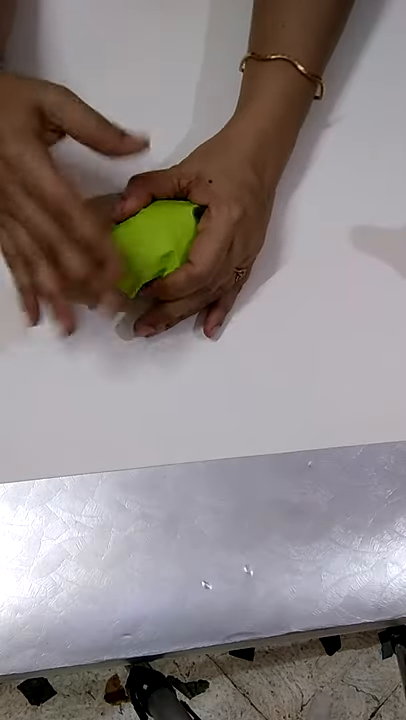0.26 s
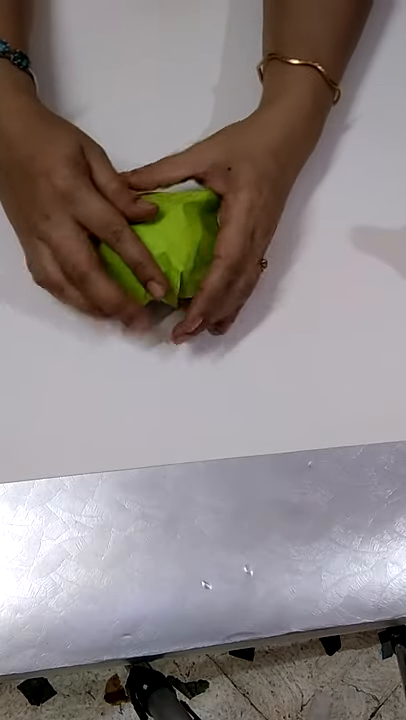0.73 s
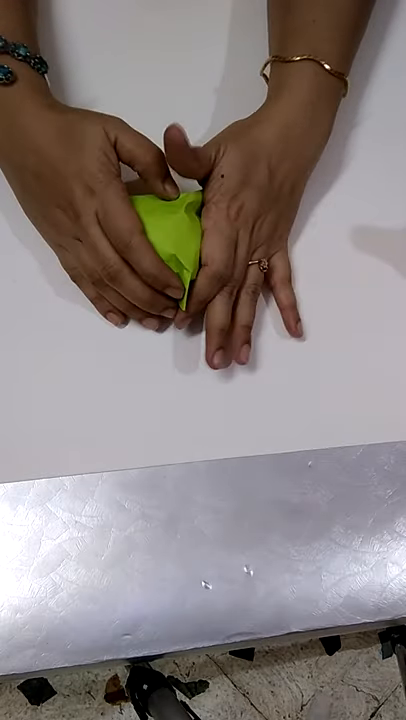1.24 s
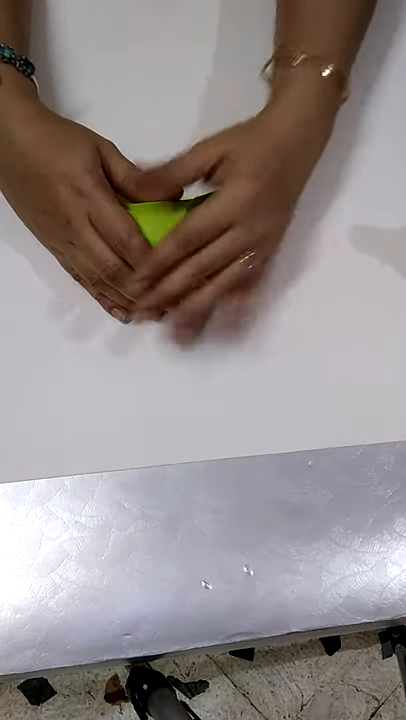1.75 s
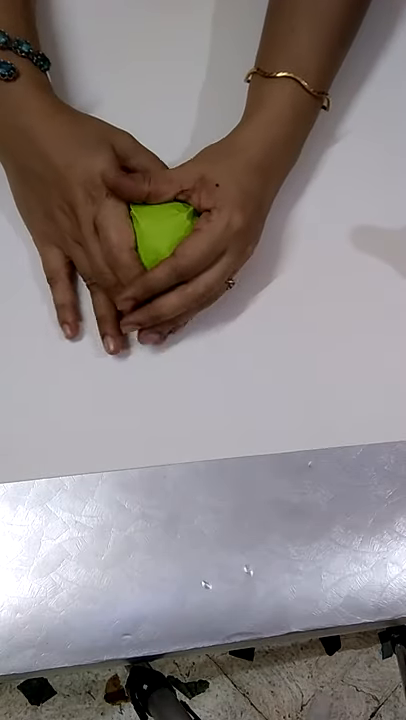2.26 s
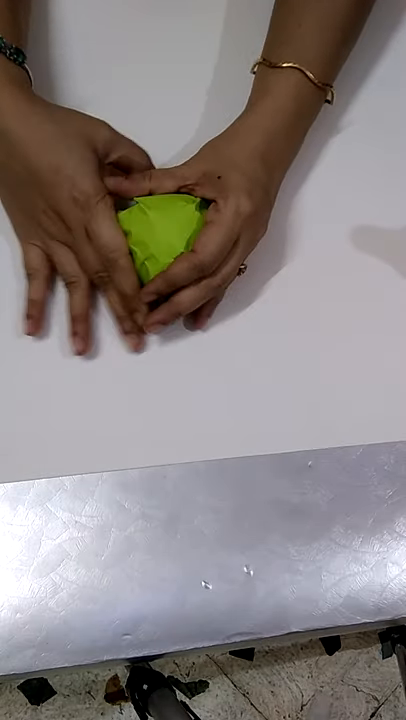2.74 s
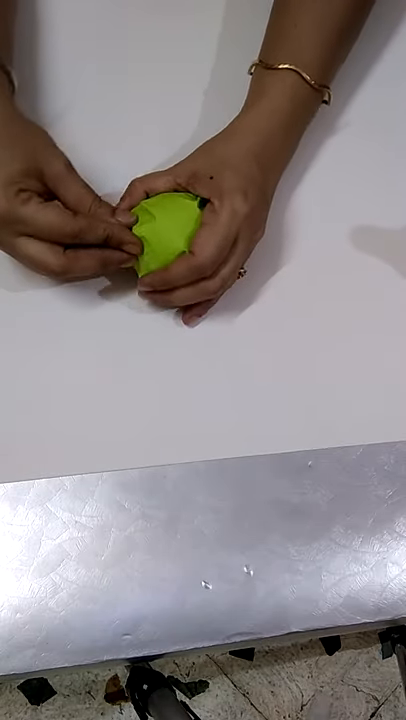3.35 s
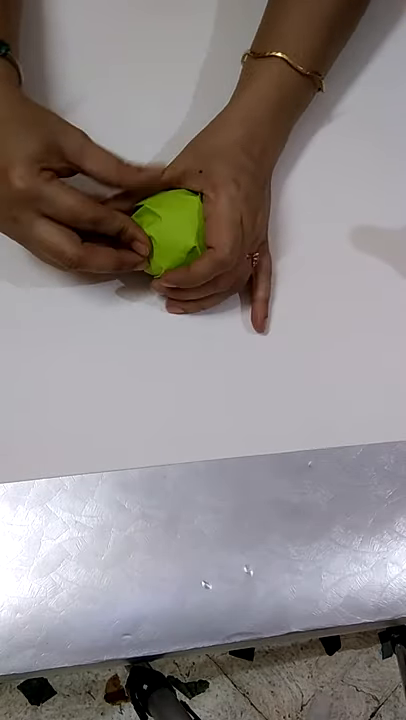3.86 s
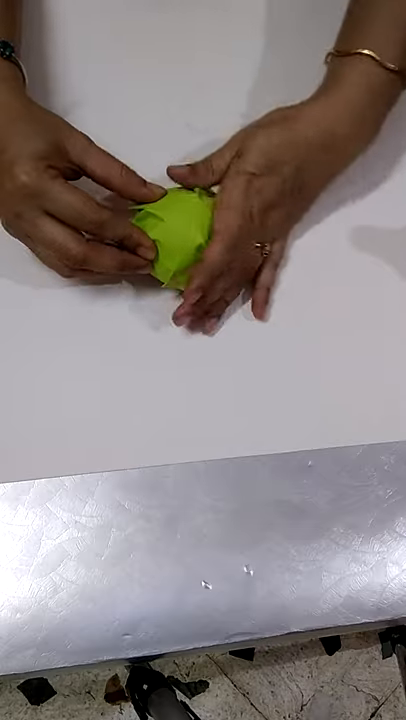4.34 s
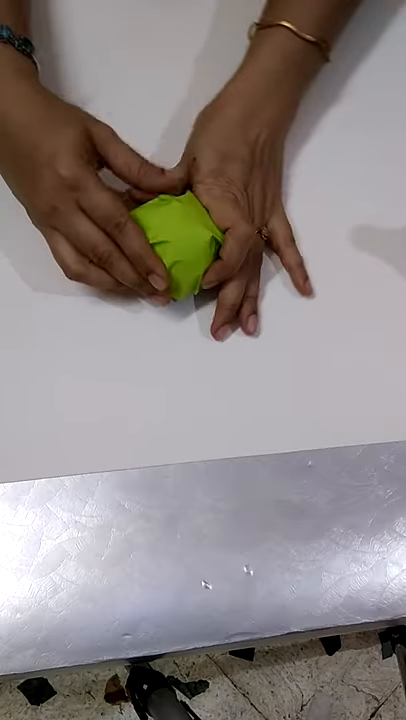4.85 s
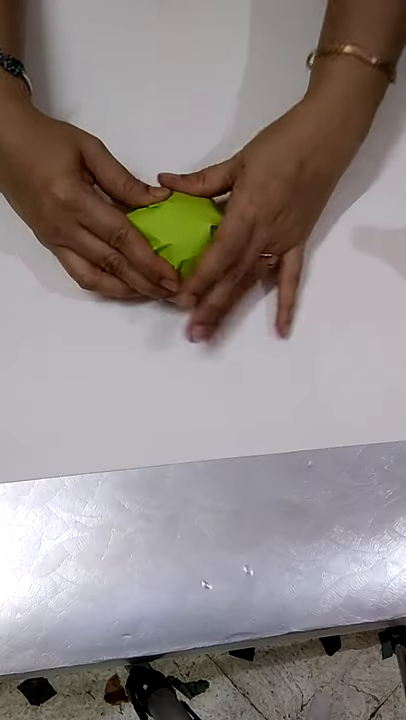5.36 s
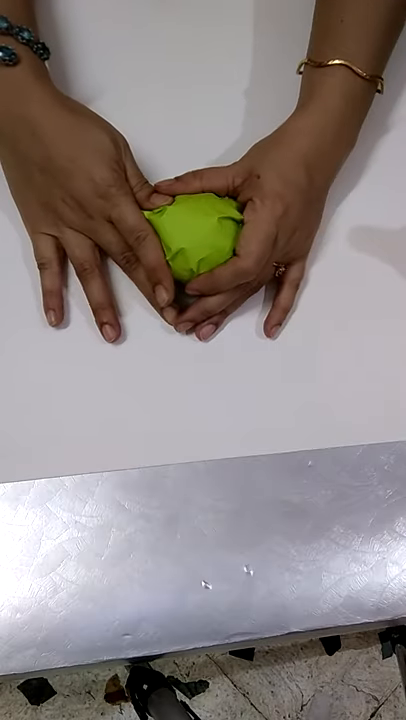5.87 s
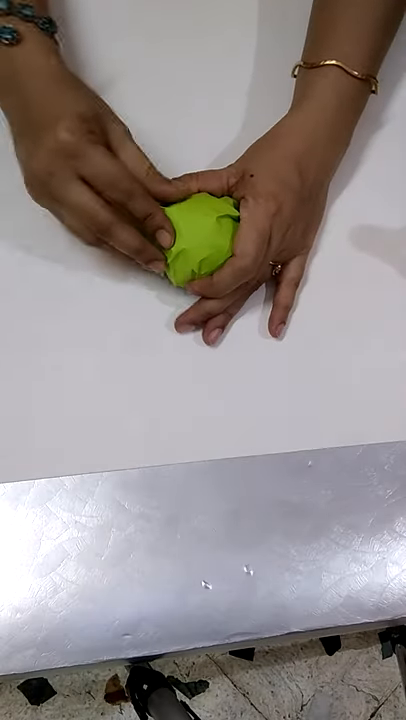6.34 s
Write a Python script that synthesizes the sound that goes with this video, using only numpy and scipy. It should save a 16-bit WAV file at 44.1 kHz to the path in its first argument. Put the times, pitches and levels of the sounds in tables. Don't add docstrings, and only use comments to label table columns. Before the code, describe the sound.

Two close microphones above a hollow table in a small bare room catch stiff paper being folded around a ball. From 0 to 0.5 seconds there are soft knocks, quick rustling swipes and a few dry ticks. After a sparse gap, creasing resumes near 0.9, with a strong hollow snap at 1.2 and dull hand thuds around 1.4. At about 2.1 the ball lands with the heaviest low thump and a bright brush of skin, followed by rolling bumps. Small airy pops gather from 2.5 to 3.1. Crisp crackles cluster from 3.2 to 3.9, then lighter rustle and cracks lead to a loud crack and hollow pop at 4.96. Knocks and crinkles continue densely from 5.2 to 6.2; a very sharp snap at 6.43 and smaller cracks end it. Short room echoes, faint hiss and a distant wavering hum lie beneath.

```python
import sys
import numpy as np
from scipy import signal
from scipy.fft import rfft, irfft
from scipy.io import wavfile
from scipy.ndimage import uniform_filter1d

SR = 44100
rng = np.random.default_rng(int(sys.argv[2]) if len(sys.argv) > 2 else 0)


def voltage_ratio(level):
    return 10 ** (np.asarray(level, float) / 20)


def dump(signal):
    limited = np.clip(np.atleast_2d(signal).T, -1, 1)
    pcm = np.round(limited * 32767).astype(np.int16)
    wavfile.write(sys.argv[1], SR, pcm)


N = 291060
HZ = np.maximum(np.arange(N // 2 + 1) * SR / N, 1)


def rms_one(x):
    return x / np.sqrt(np.mean(x ** 2) + 1e-20)


def in_time(rows):
    s, *columns = np.transpose(rows)
    return [np.interp(np.arange(N) / SR, s, c) for c in columns]


def colour(x, points):
    hz, db = np.transpose(points)
    gain = voltage_ratio(np.interp(np.log(HZ), np.log(hz), db))
    return irfft(rfft(x, N) * gain, N)


def resonate(x, hz, width_hz):
    r = np.exp(-np.pi * width_hz / SR)
    poles = [1, -2 * r * np.cos(2 * np.pi * hz / SR), r * r]
    return signal.lfilter((1 - r * r) / 2 * np.array([1, 0, -1]), poles, x)


def ring(x, hz, t60):
    r = voltage_ratio(-60 / (t60 * SR))
    w = 2 * np.pi * hz / SR
    return signal.lfilter([0, np.sin(w)], [1, -2 * r * np.cos(w), r * r], x + 1e-18)


def butter(x, order, hz, kind="low"):
    return signal.lfilter(*signal.butter(order, hz, kind, fs=SR), x)


def grains(per_s, spread_db):
    draw = rng.random(N)
    sizes = np.minimum(rng.exponential(1, N), 5)
    return rms_one((draw < per_s / SR) * voltage_ratio(spread_db * sizes) * rng.choice([-1, 1], N))


def flutter():
    size = round(22 * SR / 1000)
    jerks = rms_one(uniform_filter1d(rng.standard_normal(N), size=size, mode="wrap"))
    return voltage_ratio(6.5 * np.clip(jerks, -2, 2))


# (pitch [re pocket], width [re pocket], level [dB])
AIR_MODES = [(.8, 0.73, -17.5), (1.0, 0.27, 12), (1.35, 0.32, 12), (1.5, 0.5, 8.5)]


def pocket(x, hz):
    air = 0
    for k, (ratio, width, db) in enumerate(AIR_MODES):
        air = air + (-1) ** k * voltage_ratio(db) * resonate(x, ratio * hz, width * hz)
    air = butter(air, 3, 2.0 * hz)
    return butter(air, 2, .5 * hz, "high")


# (frequency [Hz], level [dB per Hz])
HISS_COLOUR = [(18, -11), (60, -12.5), (110, -21.5), (300, -21), (600, -8), (1600, -17.5), (4000, -16),
               (16500, -18)]
# (frequency [Hz], level [dB rms])
HUM_TONES = [(455, -76), (697, -99), (2130, -91)]
# (time [s], hum level [dB])
MACHINE_LOAD = [(0.0, -1), (0.9, 0), (1.7, 2), (2.6, -3), (3.6, -5), (4.1, -1), (4.5, -6), (5.5, -4),
                (6.15, 3), (6.6, 1)]


def background():
    hiss = voltage_ratio(-69) * rms_one(colour(rng.standard_normal((2, N)), HISS_COLOUR))
    wobble = uniform_filter1d(rng.standard_normal(N), size=6000)
    load_db = in_time(MACHINE_LOAD)[0] + 2 * rms_one(wobble)
    t = np.arange(N) / SR
    hum = sum(voltage_ratio(db + 5 + load_db) * np.sin(2 * np.pi * hz * t) for hz, db in HUM_TONES)
    return hiss + hum


# (frequency [Hz], level [dB per Hz])
SHEET_COLOUR = [(500, -32), (1500, -3), (2800, -5), (4500, -6), (6000, -2.5), (11000, 8), (15500, -5),
                (16800, -39)]
# (time [s], level [dB], swell [ms], fade [ms])
SKIN_SLIDES = [(0.0, -52, 21, 21), (0.1, -59, 18, 18), (0.178, -46, 11, 22), (0.44, -59, 28, 18),
               (0.527, -47, 18, 28), (0.84, -64, 18, 14), (0.95, -56, 28, 18), (1.033, -44, 18, 18),
               (1.12, -55, 28, 18), (1.24, -46, 18, 35), (1.49, -59, 25, 18), (1.65, -59, 18, 22),
               (1.96, -49, 45, 35), (2.124, -35, 7, 11), (2.32, -57, 18, 18), (2.4, -56, 14, 18),
               (2.47, -56, 14, 14), (2.56, -57, 11, 14), (2.66, -66, 14, 14), (2.812, -48, 11, 28),
               (2.93, -55, 28, 28), (3.07, -54, 28, 28), (3.27, -55, 14, 14), (3.56, -59, 18, 16),
               (3.87, -52, 27, 18), (4.17, -68, 5, 8), (4.26, -59, 24, 18), (4.36, -66, 14, 14),
               (4.47, -48, 14, 22), (4.72, -49, 28, 28), (4.79, -47, 14, 11), (5.04, -51, 28, 28),
               (5.25, -59, 18, 18), (5.34, -49, 28, 28), (5.65, -58, 28, 35), (5.75, -59, 18, 18),
               (5.87, -54, 28, 25), (5.95, -49, 14, 22), (6.06, -54, 28, 25), (6.13, -53, 25, 28),
               (6.38, -57, 14, 14), (6.53, -54, 28, 60)]
# (time [s], level [dB], rise [ms], fall [ms])
SHEET_SWIPES = [
    (0.158, -47, 3.1, 5.5),
    (0.492, -63.5, 2.2, 17),
    (0.795, -66, 6, 18),
    (1.44, -51, 7.4, 9.4),
    (1.615, -55.5, 1.4, 8.5),
    (1.863, -56, 2.2, 7.5),
    (2.783, -52.5, 5.6, 10.5),
    (3.227, -54, 3.1, 15),
    (4.39, -53, 1.4, 45),
    (5.59, -66, 6, 16),
]


def rustle(rub_db):
    ms, gain = np.arange(N) / SR * 1000, voltage_ratio(-137)
    for s, db, swell_ms, fade_ms in SKIN_SLIDES:
        away = np.maximum((1000 * s - ms) / swell_ms, (ms - 1000 * s) / fade_ms)
        gain = gain + voltage_ratio(db) * np.exp(-.5 * away ** 2)
    for s, db, rise_ms, fall_ms in SHEET_SWIPES:
        since = np.maximum(ms - 1000 * s, 0)
        gain = gain + 2 * voltage_ratio(db) * (1 - np.exp(-since / rise_ms)) * np.exp(-since / fall_ms)
    fine = rms_one(colour(grains(12000, spread_db=3.0), SHEET_COLOUR))
    large_folds = pocket(grains(900, spread_db=5.0), 1300)
    small_folds = pocket(grains(600, spread_db=5.0), 1800)
    coarse = rms_one(large_folds + small_folds)
    return gain * fine * flutter() ** 0.5 + voltage_ratio(rub_db - 3.0) * coarse * flutter() ** 0.5


# (time [s], lowest mode [dB], second mode [dB re lowest])
HAND_DROPS = [(0.001, -26, -3), (0.138, -24, -2), (0.492, -21, -1), (1.278, -28.5, 3), (1.418, -13, -6),
              (1.464, -22, -6), (1.545, -27, -18), (1.56, -21, -5), (1.954, -27, -6), (1.967, -19.5, -7.5),
              (2.194, -13.5, -8), (2.229, -17, 0.5), (2.252, -11.5, -10.5), (2.424, -37, 8.5),
              (2.464, -26.5, 2), (2.622, -22, -6.5), (2.646, -23, -1), (3.808, -28, -2), (4.215, -28, -18),
              (4.259, -18.5, -4.5), (4.387, -29.5, -7), (4.593, -26, 1), (4.634, -22, -7.5),
              (4.951, -33, 7.5), (5.011, -20, -3), (5.637, -31.5, -2), (5.863, -21, -0.5),
              (5.882, -14, -6.5)]


def hand_edges():
    return [(s, db, second_db, -6.5) for s, db, second_db in HAND_DROPS]


# (time [s], lowest mode [dB], upper modes [dB re lowest])
BALL_LANDINGS = [(0.045, -25.5, -42), (0.153, -30, -18), (1.17, -28, -46), (1.214, -16.5, -3.5),
                 (1.322, -18, -12.5), (1.87, -30.5, -1.5), (1.987, -15, -32), (2.111, -7.5, -11),
                 (2.557, -17.5, -6), (2.81, -19.5, -4), (3.116, -37.5, 4), (3.233, -14, -12.5),
                 (4.026, -31, -14), (4.91, -20, -6.5), (5.045, -14, -5), (5.281, -28, 1.5),
                 (5.578, -30.5, -20), (5.714, -44, 7), (6.008, -24.5, -13), (6.096, -31, -1),
                 (6.363, -39, 2.5), (6.42, -34.5, -2), (6.577, -39, -10)]


def ball():
    return [(s, db, -9.5, upper_db) for s, db, upper_db in BALL_LANDINGS]


# (time [s], lowest mode [dB], second mode [dB re lowest])
FINGER_TAPS = [(0.25, -30, 4), (0.386, -35, -23), (0.425, -47, -7), (0.458, -48, 5), (0.076, -40, -12),
               (0.291, -44, -3), (0.594, -60.5, 15), (2.839, -39.5, 4), (2.88, -42, -6), (3.931, -53, -9),
               (4.66, -37, 9), (4.701, -45.5, 3), (4.874, -44, 1), (5.599, -43.5, 13), (5.68, -57, -7),
               (5.743, -65, -11), (5.774, -48, -14), (5.986, -37, -11), (2.394, -36.5, 9),
               (2.973, -35.5, -8), (2.989, -28.5, 1.5), (3.026, -33.5, -17), (3.061, -26, -11),
               (3.725, -30.5, -34), (3.741, -29.5, -1.5), (5.227, -31.5, -33), (5.332, -26, 5.5),
               (5.509, -35.5, -25), (5.538, -37.5, -20), (5.826, -34.5, -24), (5.928, -27, 3),
               (6.513, -39.5, -19), (6.554, -37.5, -22)]


def fingertips():
    return [(s, db, second_db, 4.5) for s, db, second_db in FINGER_TAPS]


# (frequency [Hz], level [dB], t60 [s])
TOP_MODES = [(179.3, -2.5, 0.2), (227.3, 6.5, 0.1), (289.6, 5.5, 0.044), (356, 0.5, 0.066),
             (396.5, -9.5, 0.19), (462.5, -12, 0.1), (561.3, -1, 0.043), (691, -7, 0.074)]
# (frequency [Hz], level [dB], t60 [s])
LEG_MODES = [(62.5, -13.5, 0.15), (77.7, -20.5, 0.37)]
# (time [s], extra drive of the highest modes [dB])
TOUCH_HARDNESS = [(0.0, -9), (0.7, -11), (1.3, -8), (2.05, -7), (2.2, 6), (2.45, 5), (2.75, -10), (3.05, 2),
                  (3.4, -2), (4.3, 3), (4.7, 1), (5.2, 5), (5.6, -3), (5.9, 1), (6.6, -2)]
# (time re contact [ms], drive of upper modes [dB])
HAND_SETTLING = [(-4.0, -10), (0.0, -1.5), (5.5, -4.5), (12.0, -7)]
# (time [s], level [dB])
LEG_NUDGES = [
    (6.49, -44),
    (6.53, -39),
    (6.565, -48),
    (0.95, -48),
    (6.2, -46),
    (3.3, -56),
    (1.8, -48),
]


def table(rumble_db):
    s, peak_db, second_db, upper_db = np.transpose(ball() + hand_edges() + fingertips())
    at, top, legs = np.round(s * SR).astype(int), 0, 0
    rolling = voltage_ratio(rumble_db - 36) * grains(per_s=1200, spread_db=3.5) * flutter()
    chance = rng.standard_normal((len(at), 9))
    hard_db = in_time(TOUCH_HARDNESS)[0]
    load = np.digitize(chance[:, 8], [-.45, .45]) - 1
    for k, (hz, db, t60) in enumerate(TOP_MODES):
        share_db = [0, second_db, upper_db + 1.6 * chance[:, k]][min(k, 2)]
        steps = HAND_SETTLING if k > 1 else [(0, 0.0041)]
        for bend in (-1, 0, 1):
            push = rolling * (bend == (k % 3) - 1)
            for step, (ms, step_db) in enumerate(steps):
                uneven = 1 + .3 * np.tanh(chance[:, step + 1])
                late = np.maximum(at + np.round(ms * SR / 1000 * uneven).astype(int), 0)
                drive = voltage_ratio(peak_db - 12.0 + share_db + step_db) * np.sign(chance[:, step])
                push[late] += (load == bend) * drive
            push = push * voltage_ratio(hard_db * (k > 4))
            bent_hz = hz * (1 + 0.05 * bend * min(k + 1, 3) / 3)
            top = top + voltage_ratio(db) * ring(push, bent_hz, t60)
    push = rolling + voltage_ratio(-86) * rng.standard_normal(N)
    push[at] += voltage_ratio(peak_db - 21.5)
    for s, db in LEG_NUDGES:
        push[round(s * SR)] += voltage_ratio(db)
    push = push + voltage_ratio(-85.0) * rng.standard_normal((2, N))
    for hz, db, t60 in LEG_MODES:
        legs = legs + voltage_ratio(db) * resonate(ring(push, hz, t60), hz, 42)
    flesh = np.hanning(round(1.86 * SR / 1000))
    soft = signal.butter(4, 820, fs=SR, output="sos")
    thin = signal.butter(8, 150, "high", fs=SR, output="sos")
    pushed = np.convolve(top, flesh / flesh.sum(), "same")
    return signal.sosfilt(np.vstack([soft, thin]), pushed) + legs


# (start [s], level [dB], pocket [Hz], length [ms])
THUMB_DRAGS = [(0.803, -70, 1050, 55), (0.46, -61.5, 1400, 110), (0.97, -55, 2500, 33),
               (2.631, -68, 2140, 55), (4.714, -52, 2700, 25), (5.545, -68, 1280, 70),
               (1.19, -48, 1300, 86), (1.6, -50, 2900, 30), (1.7, -72, 3400, 43), (4.39, -68, 700, 81),
               (5.2, -63.5, 654, 190), (3.5, -69, 750, 33), (0.012, -66, 2460, 48), (2, -63, 690, 254),
               (0.71, -72, 2800, 370), (3.2, -69.5, 3200, 89), (6.09, -63, 1350, 36)]


def drags():
    out = np.zeros(N)
    for s, db, hz, length_ms in THUMB_DRAGS:
        at, count = round(s * SR), round(length_ms * SR / 1000)
        swell = np.sin(np.pi * np.arange(count) / count) ** .5
        rub = rng.standard_normal(20000)[:count] * swell
        out[at:at + count] += voltage_ratio(db) * rms_one(pocket(rub, hz))
    return out * flutter() ** .3


def snaps(rows, ping=False):
    out, ms = np.zeros((2, N + 800)), np.arange(800) / SR * 1000 - 3
    noises = rng.standard_normal((len(rows), 800))
    for (s, peak_db, pop_db, pop_hz, length_ms, sharp_db), noise in zip(rows, noises):
        after = np.maximum(ms, 0)
        creak = 0.44 * np.exp(np.minimum(ms, 0) / 0.099)
        swell = creak + 1 - np.exp(-after / 0.7)
        burst = noise * swell * np.exp(-after / max(0.27 * length_ms, .08))
        click = (np.arange(800) == 140) * np.sqrt(np.sum(burst ** 2))
        both = np.array([burst, click])
        hz = 9000 * 1.25 ** np.clip(noise[0], -2, 2)
        bright = both + resonate(both, hz, .6 * hz)
        bright = resonate(resonate(bright, 5200, 26000), 7600, 30000)
        dull = butter(bright, 2, 3370)
        top_hz = min(15730 * 2 ** (min(sharp_db, 0) / 29), .45 * SR)
        bright = butter(dull + voltage_ratio(sharp_db) * (bright - dull), 2, top_hz)
        pop = pocket(np.array([click + 0.94 * burst, click]), pop_hz)
        if ping:
            pop = resonate(pop, pop_hz, 0.33 * pop_hz)
        snap = bright / abs(bright[0]).max() + voltage_ratio(pop_db + 8.5) * pop / abs(pop[0]).max()
        at = round((s - .003) * SR)
        out[:, at:at + 800] += voltage_ratio(peak_db + 4.0) * snap
    return out[:, :N]


# (time [s], peak [dB], length [ms], sharpness [dB])
CREASE_CRACKS = [(0.0689, -32, 2.1, -16), (0.138, -37.5, 1.5, 23), (0.2278, -25.5, 0.52, 4),
                 (0.2513, -32.5, 3.8, -7.5), (0.9112, -33, 1.2, -12.5), (1.8649, -32, 0.18, -13),
                 (1.935, -32.5, 0.5, -13.5), (1.955, -37, 5.7, -8), (3.1663, -49, 1.1, 0.5),
                 (3.2962, -30.5, 2.2, -7), (2.374, -38.5, 0.99, -18.5), (1.992, -36, 0.99, 6),
                 (4.168, -50, 1.3, -13), (3.238, -41, 2.4, 3), (3.469, -41, 1.3, 7), (3.521, -62, 1.9, -12),
                 (3.43, -38.5, 1.4, -1.5), (3.5042, -28, 1.6, 4), (3.748, -27, 1.5, -6),
                 (3.789, -26, 1.8, -10), (3.8097, -22.5, 0.63, -12), (3.9128, -22.5, 2.5, 4.5),
                 (4.1939, -40.5, 1.1, 18), (4.444, -24.5, 3.9, -8), (4.6868, -22, 0.42, -16),
                 (4.9616, -14.5, 0.79, -4.5), (1.4758, -34.5, 2.8, -23), (2.151, -61, 3.5, -10),
                 (1.511, -66, 3, -18), (5.202, -38.5, 1.2, 18), (5.9296, -34.5, 2.2, -11),
                 (6.0653, -34, 0.57, 20), (6.3448, -33, 1.4, -10.5), (6.365, -28.5, 3.3, -10),
                 (6.516, -21, 0.74, 10), (6.536, -27, 1.5, -2), (6.557, -45.5, 2.2, -21)]


def cracks():
    return snaps([(s, db, -36, 1240, ms, sharp_db) for s, db, ms, sharp_db in CREASE_CRACKS])


# (time [s], pop [dB], pocket [Hz], crack [dB re pop])
BULGE_POPS = [(0.872, -53, 1510, 6), (1.0066, -43, 1255, 19.5), (1.418, -40, 1760, -0.5),
              (1.476, -37.5, 1443, -16), (1.5449, -41.5, 1260, -32), (2.3373, -46.5, 1240, -4),
              (2.5496, -42.5, 1370, 4.5), (2.622, -46, 1380, -17), (2.637, -43, 1980, -34),
              (2.6897, -42, 2080, -22), (2.7982, -46, 1540, -10), (2.809, -42, 1395, 9),
              (2.974, -41.5, 1470, 9.5), (2.9882, -42.5, 1390, 7), (3.0008, -40, 1650, -15),
              (3.029, -33, 1680, 7), (3.0625, -32, 1680, 1), (3.6886, -50.5, 1360, -14),
              (3.674, -54, 1426, -10), (4.236, -57.5, 1380, -3), (0.251, -56, 1330, -13),
              (3.71, -42.5, 1230, 12.5), (4.017, -57, 1490, 4), (4.7618, -46.5, 1400, -3),
              (4.909, -48.5, 1550, -2), (4.9553, -35, 1320, 7), (4.9597, -20.5, 1316, 6.5),
              (5.594, -61, 1465, 20.5), (5.8619, -39, 1034, 9)]


def bulges():
    return snaps([(s, db + crack_db, -crack_db, hz, 0.7, -15.5) for s, db, hz, crack_db in BULGE_POPS])


# (time [s], peak [dB], hollow pop [dB re peak], sharpness [dB])
FOLD_SNAPS = [(0.3871, -36.5, -18.5, 27), (0.8899, -39, -32, -8), (1.185, -13.5, -12.5, -13),
              (1.64, -44, -6, -14.5), (2.112, -28, -16.5, -11), (2.9322, -42.5, -13, 9),
              (3.2328, -28.5, -14.5, -13.5), (3.3057, -23, -19.5, -7), (3.482, -35.5, -16, 14),
              (3.7275, -24, -20.5, -15), (3.7616, -34.5, -14.5, -10), (4.251, -48, -17, 11),
              (4.3875, -34, -7, -14), (4.649, -27, -26, -17.5), (4.656, -34, -13.5, -15.5),
              (5.226, -34.5, -14, 7), (5.283, -31.5, -12.5, -2), (5.3316, -28, -13.5, -14),
              (5.6508, -43.5, -28, -20), (5.681, -32.5, -17, -12), (5.732, -39.5, -28, -24),
              (5.778, -38.5, -11, -10), (5.8021, -35, -20, -11.5), (5.8282, -28.5, -9.5, -12.5),
              (5.883, -28.5, -12, -14.5), (5.909, -31, -10, 9), (6.01, -29.5, -15.5, -13),
              (6.104, -36.5, -37, -18.5), (6.152, -40.5, -13, 13.5), (6.425, -8.5, -18, 8)]


def folds():
    return snaps([(s, db, pop_db, 1550, 2.39, sharp_db) for s, db, pop_db, sharp_db in FOLD_SNAPS])


# (time [s], pop [dB], pocket [Hz], crack [dB re pop])
SMALL_CRINKLES = [(1.008, -39, 2300, 3.5), (0.79, -55, 1600, -10.5), (4.3, -62, 1500, -18),
                  (3.8, -53, 2200, -18), (6.5, -51.5, 1360, -18), (5.583, -48.5, 1360, -5),
                  (5, -56, 1400, -12), (5.714, -54, 1500, -12), (5.736, -65, 1420, -12),
                  (5.927, -51, 820, 11), (6.028, -50.5, 1450, -12), (6.11, -54, 1290, -20),
                  (6.134, -51.5, 1310, -22), (4.5, -65, 800, -18), (4.268, -65, 1500, -16),
                  (5.8, -56, 1400, -26), (2.4, -60.5, 1300, -22.5), (1.197, -42, 1000, -15),
                  (1.285, -45.5, 1350, -12), (5.052, -40.5, 1350, -15), (5.068, -41, 1600, -18),
                  (3.922, -56, 1500, -10), (5.652, -52, 1530, -10), (5.1, -48, 1480, -6),
                  (5.779, -47, 1450, -7)]


def crinkles():
    rows = [(s, db + crack_db, -crack_db, hz, 3, -7) for s, db, hz, crack_db in SMALL_CRINKLES]
    return snaps(rows, ping=True)


# (delay [ms], level [dB])
EARLY_BOUNCES = [(2.2, -13), (3.6, -9), (5.0, -18)]


def near_echoes(x):
    out = np.array([x, x])
    for ms, db in EARLY_BOUNCES:
        for side, extra_ms in enumerate((.25, 0)):
            lag = round((ms + extra_ms) * SR / 1000)
            out[side, lag:] += voltage_ratio(db) * x[:-lag]
    return out


# (frequency [Hz], t60 [s])
ROOM_DECAY = [(200, 0.24), (1000, 0.44), (4000, 0.42), (8000, 0.42), (15000, 0.3)]


def room_tail():
    t, tail = np.arange(int(.7 * SR)) / SR, 0
    edges = 100 * 2 ** np.arange(0, 7.5, .75)
    noise = rng.standard_normal((2, 2, len(t)))
    hz, t60 = np.transpose(ROOM_DECAY)
    for k, (low, high) in enumerate(zip(edges, np.append(edges[1:], 19000))):
        band_pass = signal.butter(2, [low, high], "band", fs=SR, output="sos")
        band = signal.sosfilt(band_pass, noise[k % 2])
        band_t60 = np.interp(np.log(low * high) / 2, np.log(hz), t60)
        tail = tail + band * voltage_ratio(-60 * (t / band_t60) ** 0.58)
    tail = tail * voltage_ratio(np.interp(t, [.001, .002, .012, .014], [-60, -13, -13, 0]))
    walls = rms_one(uniform_filter1d(rng.standard_normal(len(t)), size=90))
    tail = tail * voltage_ratio(2.2 * walls)
    return voltage_ratio(-4.5) * tail / np.sqrt(np.sum(tail[0] ** 2))


# (time [s], squeeze of the folds [dB], weight rolling on the table [dB])
HAND_WORK = [(0.0, -66, -46), (0.5, -80, -69), (0.93, -90, -64), (1.3, -55, -60), (1.43, -80, -42.5),
             (1.75, -80, -60), (2.2, -66, -41), (2.48, -58.5, -44), (2.79, -58, -60.5), (3.12, -63, -54),
             (3.46, -71, -62.5), (4.49, -74, -65), (5.16, -54, -50), (5.35, -87, -76.5), (5.59, -62, -48.5),
             (5.96, -57, -46), (6.2, -75, -68), (6.6, -70, -50)]


def scene():
    rub_db, rumble_db = in_time(HAND_WORK)
    creases = cracks() + folds() + bulges()
    sheet = creases + rustle(rub_db) + drags()
    knocks = table(rumble_db)
    tail, floor = room_tail(), background()
    near, all_round = sheet + crinkles()
    paper = near_echoes(near)
    left = np.roll(paper[0] + knocks[0], 6)
    direct = np.array([left, paper[1] + knocks[1]])
    to_room = all_round + voltage_ratio(-8) * knocks[1]
    return direct + signal.fftconvolve(to_room[None], tail, axes=1)[:, :N] + floor


def hush(pair):
    high_pass = signal.butter(2, 1920, "high", fs=SR, output="sos")
    treble = signal.sosfiltfilt(high_pass, pair)
    level_db = 10 * np.log10(uniform_filter1d(np.mean(treble ** 2, axis=0), size=900) + 1e-14)
    cut_db = np.clip(-56 - level_db, 0, 10)
    return pair - treble * (1 - voltage_ratio(-cut_db))


def roll_off(x):
    return signal.sosfilt(signal.butter(12, 17060, fs=SR, output="sos"), x)


# (frequency [Hz], difference [dB])
LEFT_MINUS_RIGHT = [(60, -4.5), (150, -1), (380, -3.5), (950, -2.5), (2380, 0.5), (4400, -3), (8100, -4),
                    (15000, 3)]
# (frequency [Hz], level [dB])
MIC_COLOUR = [(1000, -0.5), (1500, -3.5), (2100, 0), (2800, -1), (3800, 3), (5500, 2), (10500, 2),
              (13500, 8.5), (16500, 0)]


def record(dry):
    half = np.array(LEFT_MINUS_RIGHT) * [1, .5]
    pair = np.array([colour(dry[0], half), colour(dry[1], half * [1, -1])])
    pair = hush(colour(pair, MIC_COLOUR))
    mix = signal.sosfilt(signal.cheby2(10, 60, 17200, fs=SR, output="sos"), pair)
    return roll_off(mix)


dry = scene()
out = record(dry)
dump(out)
```